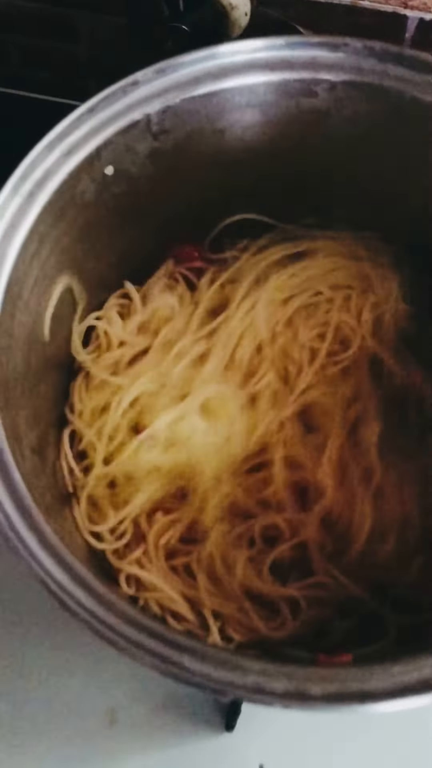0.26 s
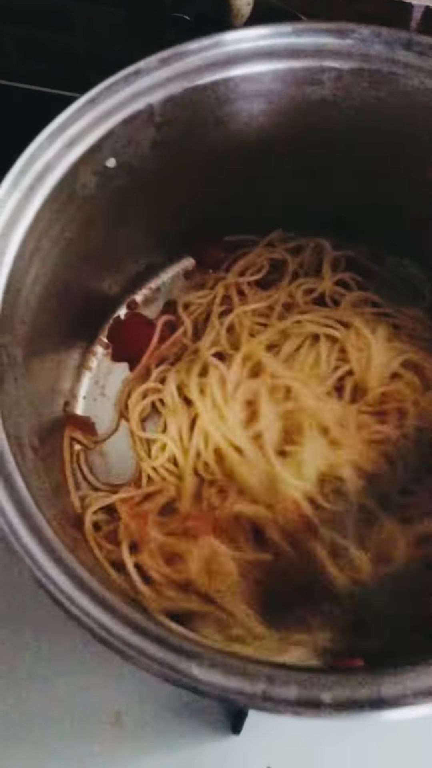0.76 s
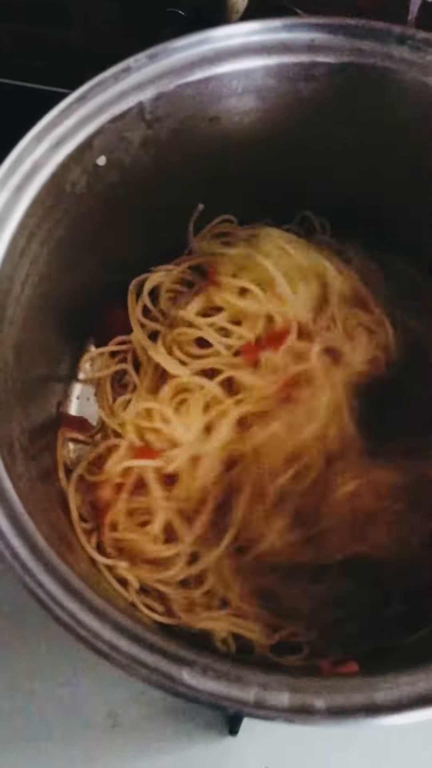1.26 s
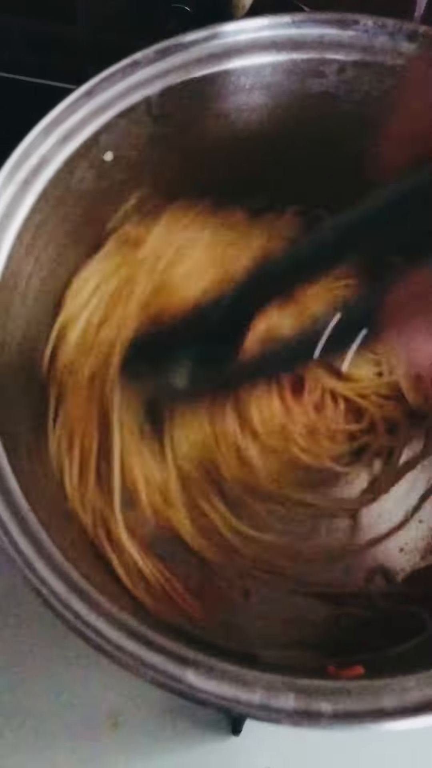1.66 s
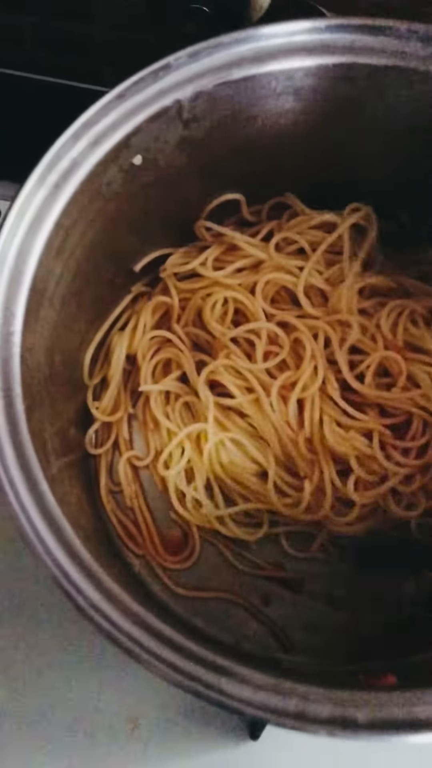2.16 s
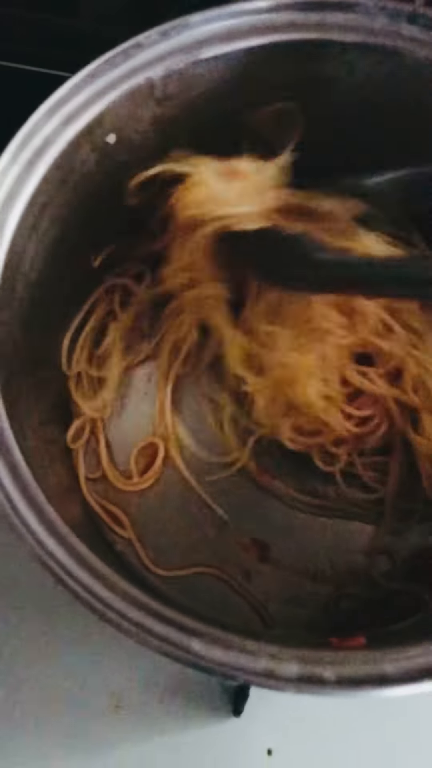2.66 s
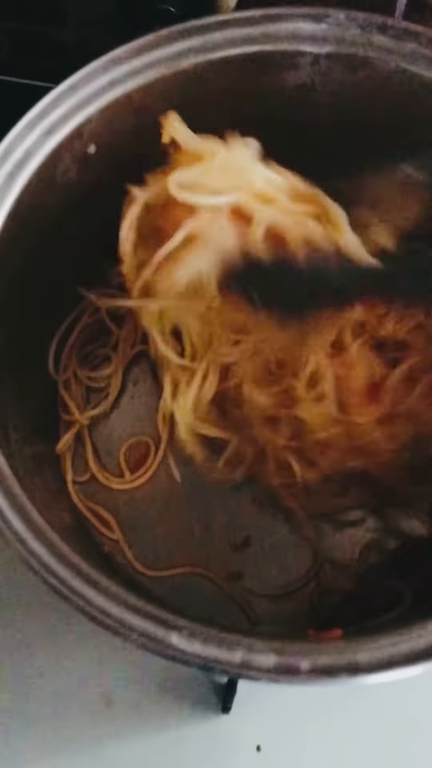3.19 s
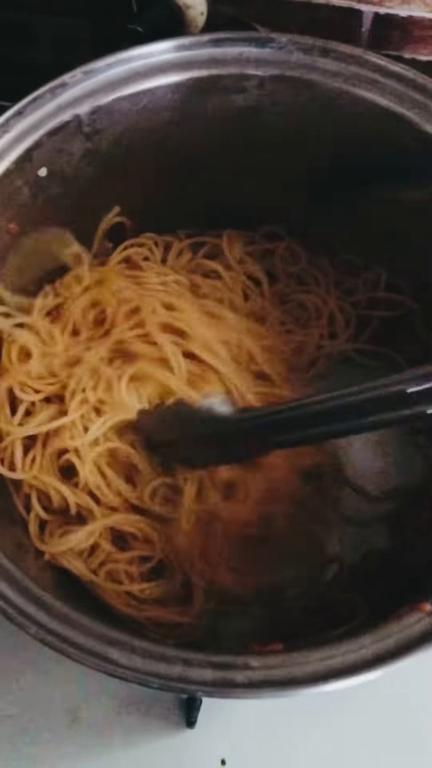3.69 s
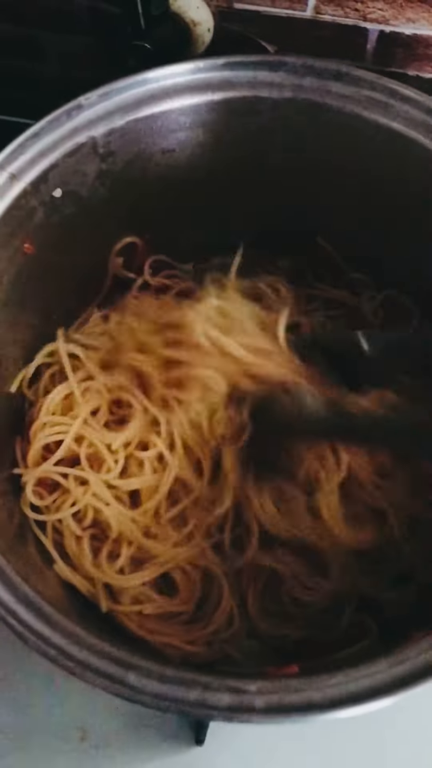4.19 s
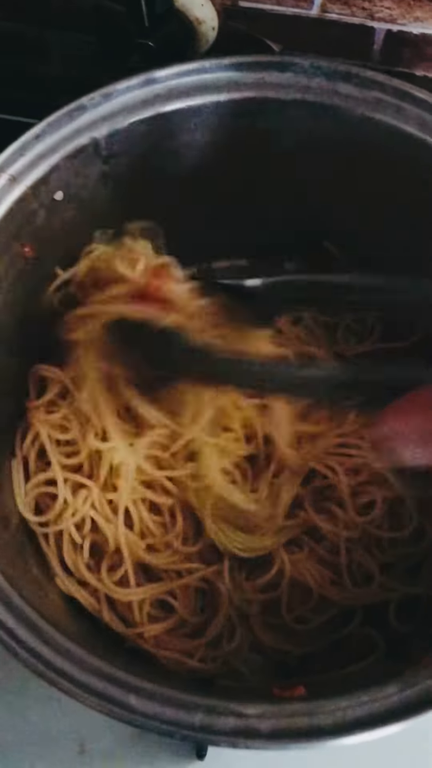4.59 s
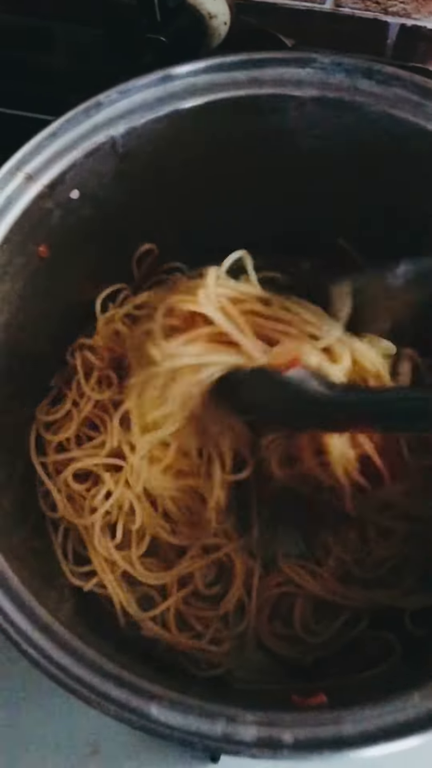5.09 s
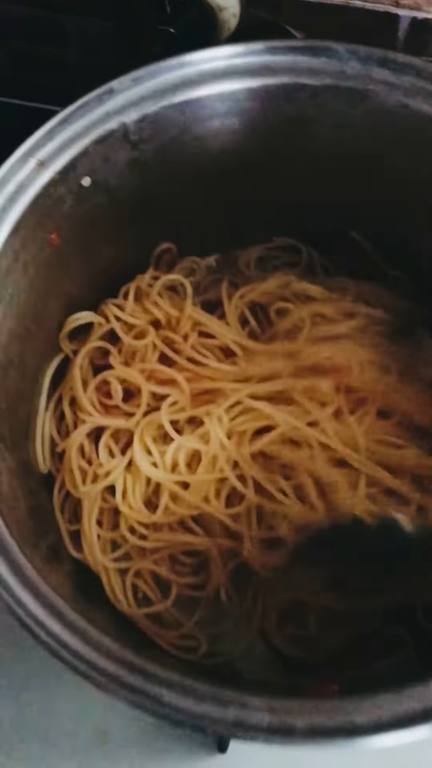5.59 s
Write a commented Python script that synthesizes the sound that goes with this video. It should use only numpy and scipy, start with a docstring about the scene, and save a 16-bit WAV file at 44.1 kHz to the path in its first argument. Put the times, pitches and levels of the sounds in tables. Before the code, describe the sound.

Close up in a small home kitchen, tong tips knock and scrape around a steel pot as wet pasta is turned. After a brief quiet start come crisp clacks, tiny squeaks, a ringing double hit, then a fairly regular tossing rhythm of clack, tick and scrape to the end. Rings are short and quickly damped. A low steady hum continues beneath, with slight room reflections.

```python
"""Small kitchen: steel tongs toss cooked spaghetti in a steel pot, over an appliance rumble.
Tips tick (short coloured noise bursts), clack (noise clatter, hollow knock, decaying sine rings), slide
(gritty noise) and squeak (harmonics) on the wall; touches damp the rings. One faint held pot ring stops
abruptly. Wet strands crackle faintly (random resonant snaps), the pot thumps and knocks (decaying sines),
and a decaying noise response gives the room echo."""
import sys
import numpy as np
from scipy import signal
from scipy.fft import rfft, irfft
from scipy.io import wavfile
from scipy.ndimage import uniform_filter1d

SR = 44100
rng = np.random.default_rng(int(sys.argv[2]) if len(sys.argv) > 2 else 0)


def transcribe(u):
    """Save the signal u as a 16-bit wav file named by the first command-line argument.

    u: samples, shape (n,) or (channels, n), limited to [-1, 1]; the rate is SR.
    q: integer samples, one column per channel.
    """
    v = np.clip(np.atleast_2d(u).T, -1, 1)
    q = np.round(v * 32767).astype(np.int16)
    wavfile.write(sys.argv[1], SR, q)


N = 257984

# appliance rumble over a faint hiss: (frequency [Hz], density [dB per Hz])
RUMBLE_SPECTRUM = [(25, -31.5), (45, -13), (60, -2.5), (77, 2), (89, 1.5), (100, 3), (118, -6.5),
                   (189, -23.5), (351, -20), (506, -32), (729, -23.5), (1600, -32), (2500, -37.5),
                   (6700, -49), (15200, -51)]
# low thumps and rings of the pot, and a short hollow knock at 4.787 s:
# (time [s], level [dB], frequency [Hz], T60 [s])
THUMPS = [(0.484, -4.5, 340, 0.0033), (0.487, -19.5, 85, 0.051), (0.814, -47.5, 264, 0.75),
          (1.34, -37.5, 262, 0.57), (4.787, -27, 736, 0.081)]
# squeaks, and a faint held pot ring near 2.1 kHz that stops abruptly (1.736 s): (start [s], end [s], start
# pitch [Hz], end pitch [Hz], level [dB], fall per overtone [dB])
HELD_TONES = [(0.277, 0.303, 2230, 2150, -13.5, -3), (1.525, 1.736, 2080, 2090, -45, -28),
              (3.774, 3.804, 2100, 2480, -22, -13.5)]
# tips sliding on the wall: (start [s], end [s], start RMS [dB], end RMS [dB])
SLIDES = [(0.287, 0.306, -17, -23.5), (0.486, 0.579, -19.5, -39.5), (1.104, 1.172, -34.5, -39.5),
          (1.358, 1.464, -17.5, -51), (2.014, 2.082, -24, -49), (2.181, 2.196, -35.5, -43),
          (2.32, 2.44, -42, -45), (2.42, 2.568, -34, -38), (2.962, 3.049, -58, -29.5),
          (3.304, 3.439, -31, -44.5), (3.774, 3.81, -34, -22.5), (4.087, 4.166, -44, -27),
          (4.437, 4.593, -30, -51), (4.845, 4.959, -36, -26), (5.177, 5.298, -34.5, -44.5),
          (5.537, 5.66, -24, -47)]
# friction spectrum of a slide: (frequency [Hz], density [dB per Hz])
RASP_SPECTRUM = [(400, -38), (700, -5), (1400, -14), (1800, -3), (3320, -3), (6190, 2.5), (7460, -5),
                 (15300, -1)]
# light ticks of the tips: (time [s], level [dB], gain below 4 kHz [dB])
TICKS = [(0.0992, -35.5, 1), (0.131, -27.5, 6.5), (0.4624, -19, -5), (0.4897, -10, -12), (0.604, -20, 11.5),
         (0.788, -38.5, -6), (1.148, -28, 1.5), (1.274, -27, -3), (1.6502, -37.5, 10), (1.721, -35.5, -2),
         (1.786, -36.5, 0), (1.8687, -11, -1), (2.0186, -14.5, 5), (2.08, -11, -8), (2.1904, -21.5, -21),
         (2.2476, -20, -15), (2.2705, -33.5, 1), (2.383, -30.5, -8.5), (2.3947, -25, -6), (2.45, -29, 10),
         (2.525, -28.5, 16.5), (2.533, -32.5, 11.5), (2.806, -36.5, 0), (2.835, -15.5, -6),
         (3.2273, -36.5, -12), (3.252, -8, -9.5), (3.373, -15.5, 11.5), (3.616, -11, 2.5), (3.6522, -23, 3),
         (3.7586, -33, 7), (3.982, -33.5, 8), (4.01, -16, -2.5), (4.0354, -9, -5.5), (4.128, -30.5, -3),
         (4.141, -14, -4.5), (4.385, -44.5, 13), (4.4313, -19, -4), (4.477, -14.5, -7), (4.7599, -31.5, 11),
         (4.814, -10.5, 0), (4.879, -11.5, -3), (4.902, -16, -3), (5.145, -18, -3), (5.1826, -13.5, -14.5),
         (5.2466, -12.5, -8), (5.4718, -33.5, 14), (5.513, -15, -8.5), (5.6259, -10.5, 8.5)]
# clacks; the first row is a faint pot ring already sounding at the start, 5.277 s a faint tick that damps
# the ring: (time [s], clatter level [dB], hollow knock level [dB], clatter T60 [s], wall ring level [dB],
# place round the wall [0-1], favoured pitch of the spot [Hz], its ring level [dB], second favoured pitch [Hz])
CONTACTS = [(0.001, -49, -49, 0.19, -49.5, 0, 1109, -42.5, 2743),
            (0.225, -8.5, -36, 0.054, -31.5, 0.3, 4125, -22, 2743),
            (0.2555, -9, -14, 0.053, -43, 0.6, 4240, -15, 3580),
            (0.484, -2, -13.5, 0.023, -39, 0.8, 4160, -20, 1780),
            (0.502, -17.5, -23, 0.055, -40, 0.8, 4000, -20, 3580),
            (0.6347, -22, -21.5, 0.065, -47, 0.8, 1720, -29, 3225),
            (0.812, -9.5, -18, 0.041, -49.5, 0.1, 1268, -25.5, 1109),
            (1.0627, -11, -20.5, 0.068, -45.5, 0.46, 4120, -24, 2130),
            (1.3357, -10, -18, 0.072, -12.5, 0.8, 3580, -5, 4680),
            (1.3425, -16.5, -17, 0.074, -17.5, 0.97, 2881, -6.5, 3935),
            (1.403, -10.5, -15, 0.08, -34.5, 0.6, 3580, -18.5, 1760),
            (2.067, -8.5, -23, 0.065, -69, 0.4, 1740, -28.5, 4727),
            (2.329, -14, -28, 0.031, -63, 0.9, 4120, -30, 5245),
            (2.875, -8.5, -23.5, 0.063, -38, 0.1, 1109, -33.5, 1760),
            (2.952, -14, -24, 0.075, -56, 0.1, 1268, -34, 2160),
            (3.015, -19, -30.5, 0.031, -64, 0.2, 948, -37, 712),
            (3.307, -9, -24.5, 0.074, -31, 0.8, 1760, -27.5, 5245),
            (3.342, -17.5, -31, 0.027, -33, 0.94, 712, -30, 948),
            (3.389, -11.5, -13, 0.051, -46, 0.1, 712, -22.5, 5245),
            (3.6597, -8.5, -18, 0.079, -22, 0.26, 4110, -13.5, 1760),
            (3.766, -19, -18.5, 0.08, -45, 0, 1800, -24, 4375),
            (4.071, -9, -27.5, 0.066, -24.5, 0.82, 4095, -31, 5245),
            (4.151, -10.5, -13, 0.043, -41.5, 0.84, 712, -25.5, 948),
            (4.444, -12, -50, 0.11, -57, 0.4, 2881, -25, 3225),
            (4.829, -7.5, -25.5, 0.11, -26, 0.92, 1109, -32, 4095),
            (4.925, -13, -12, 0.044, -36, 0.8, 3225, -19.5, 712),
            (5.1923, -11, -39, 0.11, -42.5, 0.1, 2860, -12.5, 4535),
            (5.277, -29.5, -50, .04, -52, 0.27, 5245, -42.5, 3960),
            (5.5438, -7, -25, 0.1, -24.5, 0.46, 4095, -31, 1760),
            (5.637, -10.5, -13, 0.062, -37, 0.26, 948, -26.5, 712)]
# bright tip contact spectrum: (frequency [Hz], density [dB per Hz])
CLATTER_SPECTRUM = [(590, -62.5), (1000, -14.5), (1470, -27), (2220, -15.5), (2500, -14), (3160, -6),
                    (3470, -16), (3990, -9.5), (5950, 0), (9960, -6.5), (13000, -9), (15600, -5)]
# hollow knock spectrum: (frequency [Hz], density [dB per Hz])
KNOCK_SPECTRUM = [(200, -14), (500, -18.5), (800, -6.5), (1500, -0.5), (2200, 5.5), (3500, 5.5),
                  (6000, -35.5)]
# rings of the steel pot: (frequency [Hz], relative level [dB], T60 [s])
POT_RINGS = [(712, 0, .1), (948, 7, .1), (1109, -4, .4), (1268, -3, .2), (1760, 2, .1), (1843, -4, .18),
             (2034, 0, .5), (2097, -4, .2), (2223, 0, .6), (2525, -3, .3), (2743, -10, .2), (2881, -15, .3),
             (3225, -6, .15), (3580, -3, .11), (3990, -6, .2), (4095, 0, .11), (4125, -5, .19),
             (4375, -12, .2), (4535, -5, .16), (4727, -8, .16), (5245, -7, .14), (6700, -7, .1)]
# damped modes of the tongs: (frequency [Hz], width [Hz], relative level [dB])
TONG_MODES = [(4070, 300, -5), (5010, 370, 9.5), (6696, 74, 2)]

RUMBLE_DB = -38.5
KITCHEN_T60_S, KITCHEN_DB, WALL_CUT_HZ = 0.21, -12.5, 3000
STRANDS_PER_S, STRANDS_DB = 330, -55
LAND_S, LIFT_S = 0.0015, 0.006   # time to press on and to lift off
CLUMP_DB = 1.5   # unevenness of a slide
SLIDE_RING_DB = 6   # pot rings fed by a sliding tip
TICK_T60_S = 0.032
CRACK_DB, CRACK_S = -2, 0.005   # extra burst amplitude at first contact
SNAP_DB = 11   # one-sample spike of first contact, re hollow knock
TOUCH_DAMPING_DB, TOUCH_S = -18.5, 0.0074   # drop of the rings at the next contact
WOBBLE_DB, DETUNE = 1.5, 0.001   # pasta brushing the wall: level waver; relative pitch spread per contact
FLOOR_HZ, WALL_HZ, TWIN_HZ = 950, 2130, (2034, 2223)   # floor rings below, mid wall, the twin rings
FLOOR_RING_DB, FLOOR_FALL_DB_PER_OCTAVE = -12, -38.5   # level re hollow knock
LOWER_WALL_DB, MIDDLE_WALL_DB, UPPER_WALL_DB = -16.5, -13, -9   # re the twins: low, near, high
TREBLE_HZ, TREBLE_RING_DB = 2600, -26   # above this pitch, least ring level re clatter
PLACE_SPREAD_DB = 3.5   # chance strength of each ring but the twins
FAVOUR_OCTAVES, SECOND_DB = 0.04, -3   # reach of a favoured pitch; second pitch re first
GRIP_SPLIT, GRIP_SHIFT_DB = 0.018, 2.5   # relative offset of each tong mode to either side; level spread
CUTOFF_HZ = 16800


def amp(db):
    """Convert dB to gain."""
    return 10 ** (np.asarray(db) / 20)


def rms_one(x):
    """Scale to RMS 1."""
    return x / np.sqrt(np.mean(x ** 2) + 1e-20)


def add(out, start_s, x):
    """Mix x into out from start_s on."""
    i = round(start_s * SR)
    out[i:i + len(x)] += x[:N - i]


def wander(count, per_s):
    """Normal random values, per_s of them a second, joined by straight lines."""
    knots = rng.standard_normal(count // 50)
    return np.interp(np.arange(count) * per_s / SR, np.arange(len(knots)), knots)


def lumpy(count, per_s, lump_db):
    """Noise whose level wavers as micro-contacts come and go."""
    return rng.standard_normal(count) * amp(lump_db * wander(count, per_s))


def colour(x, points, size=4096):
    """Minimum-phase filter with the given spectrum, unit power gain for white noise."""
    hz = np.maximum(np.fft.rfftfreq(size, 1 / SR), 1)
    point_hz, point_db = np.array(points).T
    log_gain = np.interp(np.log(hz), np.log(point_hz), point_db) * np.log(10) / 20
    cepstrum = irfft(log_gain)
    cepstrum[1:size // 2] *= 2          # folding the cepstrum gives minimum phase
    cepstrum[size // 2 + 1:] = 0
    taps = irfft(np.exp(rfft(cepstrum)))
    return signal.fftconvolve(x, taps / np.sqrt(np.sum(taps ** 2)))[:len(x)]


def resonance(x, hz, width_hz):
    """Two-pole peak with gain 1 on top."""
    r = np.exp(-np.pi * width_hz / SR)
    poles = [1, -2 * r * np.cos(2 * np.pi * hz / SR), r * r]
    return signal.lfilter([(1 - r * r) / 2, 0, (r * r - 1) / 2], poles, x)


def appliance():
    """Steady noise, strongest at low frequencies."""
    return amp(RUMBLE_DB) * colour(rng.standard_normal(N + SR), RUMBLE_SPECTRUM, size=16384)[SR:]


def kitchen(x):
    """Room echo: decaying noise response whose treble dies twice as fast."""
    t = np.arange(SR // 2) / SR
    noise = rng.standard_normal(len(t))
    low = signal.sosfilt(signal.butter(1, WALL_CUT_HZ, fs=SR, output="sos"), noise)
    high = noise - low
    echo = low * amp(-60 * t / KITCHEN_T60_S) + high * amp(-60 * t / (0.5 * KITCHEN_T60_S))
    return amp(KITCHEN_DB) * signal.fftconvolve(x, echo / np.sqrt(np.sum(echo ** 2)))[:N]


def thumps():
    """Low thumps and rings of the pot and a short hollow knock: decaying sines."""
    out, t = np.zeros(N), np.arange(SR // 3) / SR
    for start_s, db, hz, t60_s in THUMPS:
        add(out, start_s, amp(db - 60 * t / t60_s) * np.sin(2 * np.pi * hz * t))
    return out


def strands():
    """Wet strands part with tiny snaps, in flurries, each dealt to one of six pitches."""
    rate_per_s = STRANDS_PER_S * amp(5 * wander(N, per_s=3.7))
    happens = rng.random(N) < rate_per_s / SR
    sizes = amp(4.5 * np.minimum(rng.exponential(1, N), 4)) * happens
    dealt, noise = rng.integers(0, 6, N), rng.standard_normal(N)
    decay = amp(-60 / (0.0062 * SR))   # per sample, T60 6.2 ms
    out = np.zeros(N)
    for k, hz in enumerate(np.geomspace(4000, 14000, num=6)):
        envelope = signal.lfilter([1], [1, -decay], sizes * (dealt == k) + 1e-18)
        out += resonance(envelope * noise, hz, 0.74 * hz)
    return amp(STRANDS_DB) * out


def squeaks_and_held_ring():
    """Stick-slip squeaks and a faint held pot ring: jittered tones with two overtones, rounded in level."""
    out = np.zeros(N)
    for start_s, end_s, start_hz, end_hz, db, fall_db in HELD_TONES:
        length_s = end_s - start_s
        t = np.arange(round(length_s * SR)) / SR
        jitter = rms_one(uniform_filter1d(rng.standard_normal(len(t)), size=60))
        hz = np.interp(t, [0, length_s], [start_hz, end_hz]) * (1 + 0.01 * jitter)
        cycles = np.cumsum(hz) / SR
        tone = sum(amp(fall_db * k) * np.sin(2 * np.pi * (k + 1) * cycles) for k in range(3))
        envelope = np.sin(np.pi * t / length_s) ** 0.5
        add(out, start_s, amp(db) * envelope * tone)
    return out


def slides():
    """Gritty friction: clumps of contacts, each band gritty in its own way; the pot rings along."""
    stroke, t = np.zeros(N), np.arange(N) / SR
    for start_s, end_s, start_db, end_db in SLIDES:
        edge = np.clip(np.minimum((t - start_s) / LAND_S, (end_s - t) / LIFT_S), 0, 1)
        stroke += edge * amp(np.interp(t, [start_s, end_s], [start_db, end_db]))
    rasp = colour(stroke * lumpy(N, per_s=180, lump_db=1.0), RASP_SPECTRUM)
    together = wander(N, per_s=130.0)
    grit = np.zeros(N)
    for k, edges_hz in enumerate(((200, 2500), (2500, 4500), (4500, 8000), (8000, 16500))):
        band = signal.sosfilt(signal.butter(2, edges_hz, "band", fs=SR, output="sos"), rasp)
        clumps = amp(CLUMP_DB * (together + wander(N, per_s=54.0)))
        grit += (-1) ** k * band * clumps   # alternate polarity
    rings = np.zeros(N)
    for hz, db, t60_s in POT_RINGS:
        width_hz = np.log(1000) / np.pi / t60_s
        rings += amp(db / 2) * resonance(grit, hz, width_hz)   # half the level contrast of the table
    return grit + amp(SLIDE_RING_DB) * rings


def ticks():
    """Short bright noise bursts, fuller or thinner with where the tip lands."""
    out, t = np.zeros(N), np.arange(SR // 5) / SR
    grain = colour(rng.standard_normal(N + SR), CLATTER_SPECTRUM)
    low = signal.sosfiltfilt(signal.butter(3, 4000, fs=SR, output="sos"), grain)
    decay = amp(-60 * t / TICK_T60_S) + amp(-35.5 - 60 * t / 0.055)   # fast burst, faint slower tail
    shape = (1 - np.exp(-t / 0.00039)) * decay
    for start_s, db, low_db in TICKS:
        i = round(start_s * SR)
        span = slice(i, i + len(t))
        add(out, start_s, amp(db) * shape * (grain[span] + (amp(low_db) - 1) * low[span]))
    return out


def ring_strengths(hz, clatter_db, knock_db, wall_db, place, spot_hz, spot_db, second_hz, chance):
    """Floor rings follow the knock, place trades the twins, the spot lifts rings near its two pitches."""
    wall_offsets_db = [LOWER_WALL_DB, MIDDLE_WALL_DB, UPPER_WALL_DB]
    wall = wall_db + np.interp(np.log2(hz / WALL_HZ), [-0.7, -0.25, 1], wall_offsets_db)
    wall = np.where(hz > TREBLE_HZ, np.maximum(wall, clatter_db + TREBLE_RING_DB), wall)
    floor = knock_db + FLOOR_RING_DB + FLOOR_FALL_DB_PER_OCTAVE * np.log2(hz / hz[0])
    db = np.where(hz < FLOOR_HZ, floor, wall) + PLACE_SPREAD_DB * chance
    angle = np.pi / 2 * np.clip(place, 0.02, 0.98)
    db[hz == TWIN_HZ[0]] = wall_db + 20 * np.log10(np.cos(angle))
    db[hz == TWIN_HZ[1]] = wall_db + 20 * np.log10(np.sin(angle))
    for favoured_hz, top_db in ((spot_hz, spot_db), (second_hz, spot_db + SECOND_DB)):
        db = np.maximum(db, top_db - 6 * (np.log2(hz / favoured_hz) / FAVOUR_OCTAVES) ** 2)
    return db


def clacks():
    """Each row gives a bright clatter, a hollow knock and rings that the next row damps."""
    bright, body, ring = np.zeros((3, N))
    t = np.arange(SR // 2) / SR
    hz, mode_db, mode_t60_s = np.transpose(POT_RINGS)[:, :, None]   # one row per ring
    grain = lumpy(N + SR, per_s=700, lump_db=1.0)
    phases = rng.random((len(CONTACTS), len(POT_RINGS), 1))   # cycles
    chances = rng.standard_normal((len(CONTACTS), 2, len(POT_RINGS), 1))
    wobble = amp(WOBBLE_DB * np.array([wander(N + SR, per_s=54.0) for _ in POT_RINGS]))
    gaps_s = np.diff(np.array(CONTACTS)[:, 0], append=N / SR)   # time to the next row
    onset = 1 - np.exp(-t / 0.000099)
    crack = 1 + amp(CRACK_DB) * np.exp(-(t / CRACK_S) ** 2)   # first contact is hardest
    swell = 1 - np.exp(-t / 0.00025)
    for contact, phase, (chance, shift), gap_s in zip(CONTACTS, phases, chances, gaps_s):
        start_s, clatter_db, knock_db, t60_s, *wall = contact
        i = round(start_s * SR)
        burst = grain[i:i + len(t)] * onset * crack
        clatter_decay = amp(-60 * t / t60_s) + amp(-16.5 - 60 * t / 0.026)   # two decays
        add(bright, start_s, burst * amp(clatter_db) * clatter_decay)
        add(body, start_s, burst * amp(knock_db - 60 * t / (1.09 * t60_s)))
        body[i] += amp(knock_db + SNAP_DB)
        strength_db = mode_db + ring_strengths(hz, clatter_db, knock_db, *wall, chance)
        damping_db = TOUCH_DAMPING_DB * np.clip((t - gap_s) / TOUCH_S, 0, 1)
        level = amp(strength_db - 60 * t / mode_t60_s + damping_db) * wobble[:, i:i + len(t)]
        tones = np.sin(2 * np.pi * (hz * (1 + DETUNE * shift) * t + phase))
        add(ring, start_s, swell * np.sum(level * tones, axis=0))
    return colour(bright, CLATTER_SPECTRUM), colour(body, KNOCK_SPECTRUM) + ring


def tong_body(x):
    """Add the tongs' resonances at unchanged total power; shifting grip makes each come and go."""
    out = x.copy()
    for k, (hz, width_hz, db) in enumerate(TONG_MODES):
        for side in (-1, 1):
            drive = x * amp(db - 6.5 + GRIP_SHIFT_DB * wander(N, per_s=28.0))
            out += (-1) ** k * resonance(drive, hz * (1 + side * GRIP_SPLIT), width_hz)
    return rms_one(out) * np.sqrt(np.mean(x ** 2))


def scene():
    """Rumble, tongs and pot close by, and their echo."""
    clatter, knocks = clacks()
    tongs = tong_body(clatter + ticks() + slides())
    pot = tongs + knocks + squeaks_and_held_ring() + strands() + thumps()
    return (appliance() + pot + kitchen(pot))[None]


def record(dry):
    """Round peaks towards 0.88 of full scale, then cut the top."""
    rounded = 0.88 * dry / (1 + np.abs(dry) ** 4) ** 0.25
    return signal.sosfilt(signal.cheby2(14, 90, CUTOFF_HZ, fs=SR, output="sos"), rounded)


dry = scene()
out = record(dry)
transcribe(out)
```